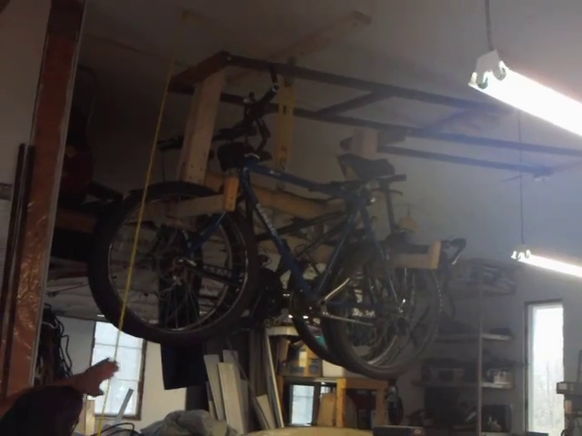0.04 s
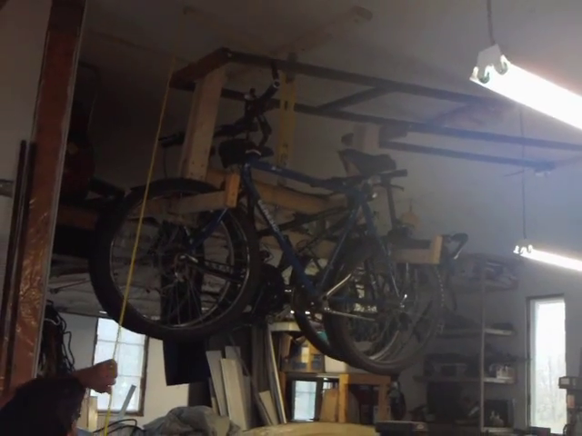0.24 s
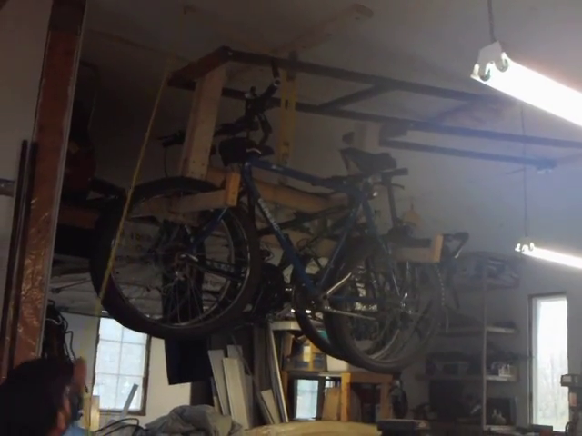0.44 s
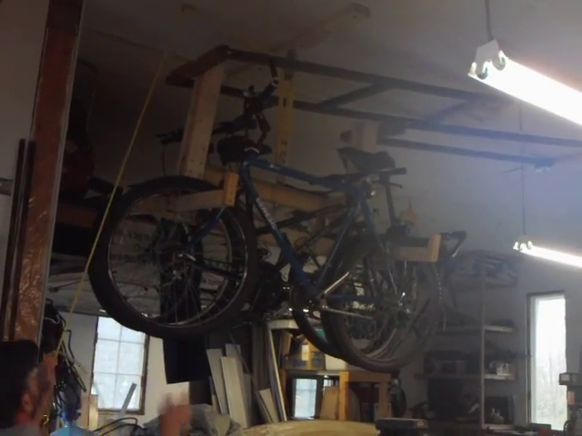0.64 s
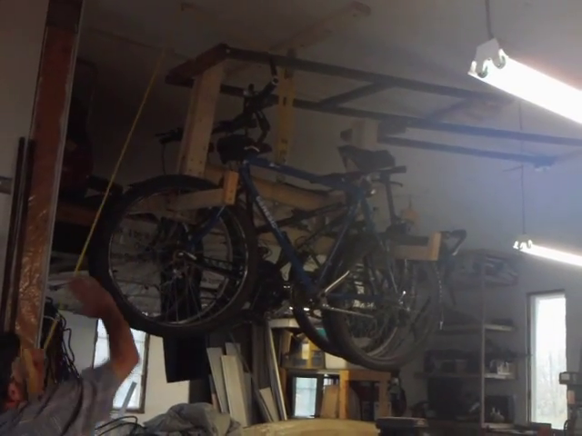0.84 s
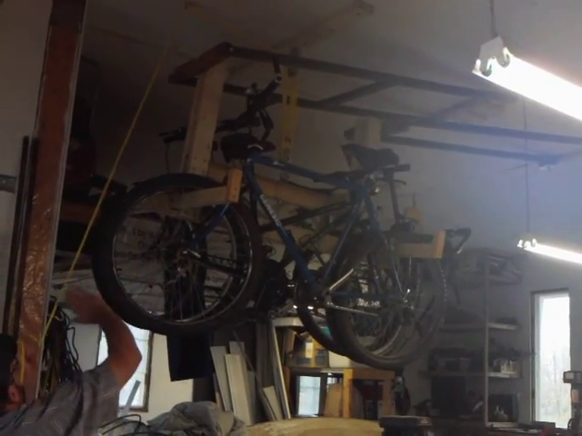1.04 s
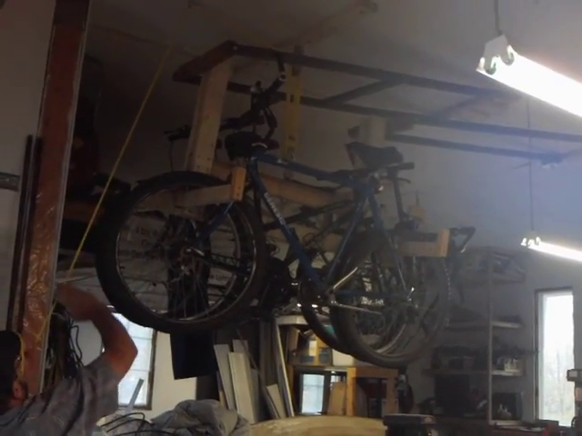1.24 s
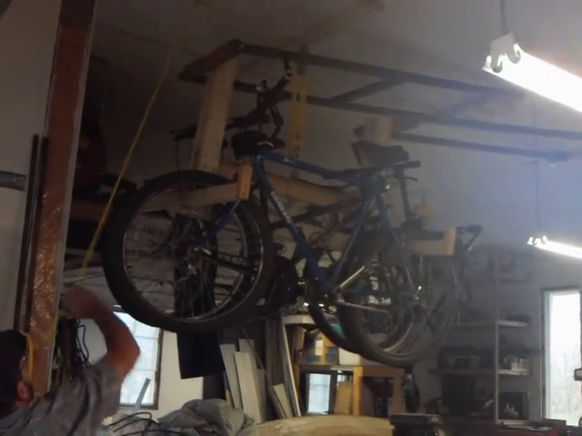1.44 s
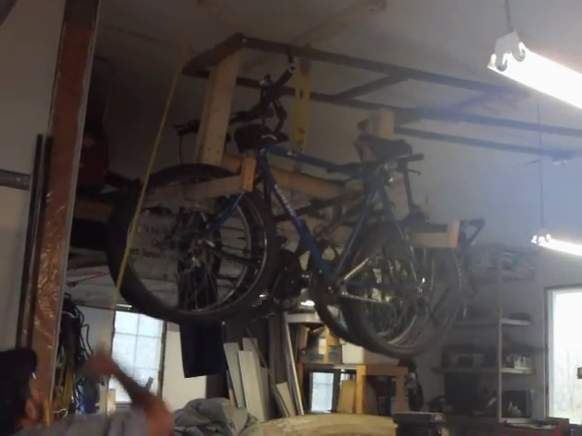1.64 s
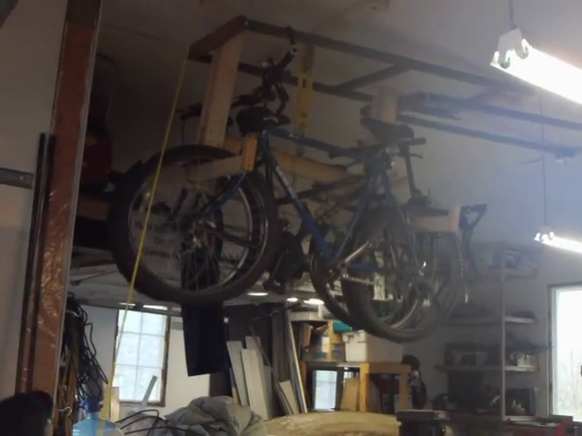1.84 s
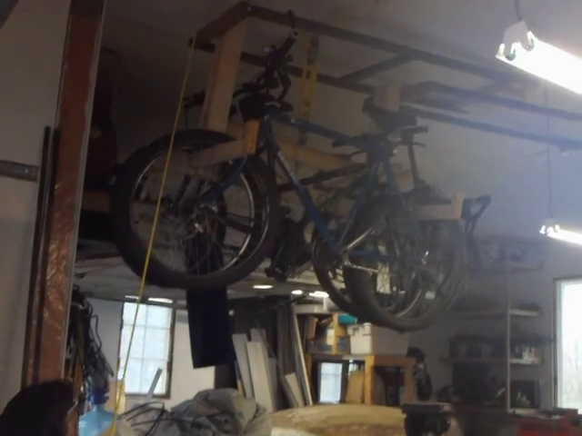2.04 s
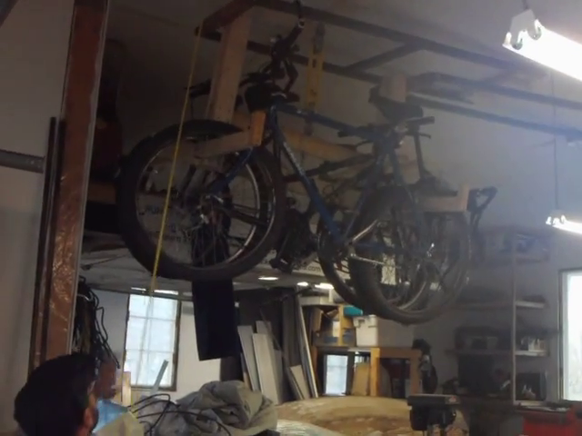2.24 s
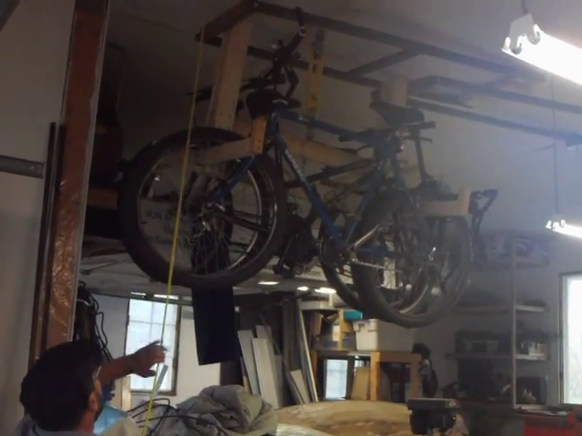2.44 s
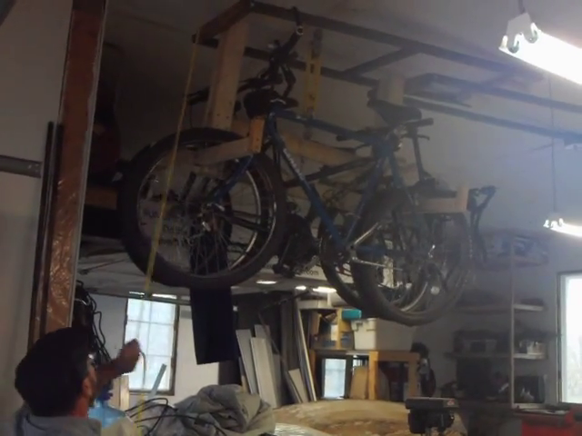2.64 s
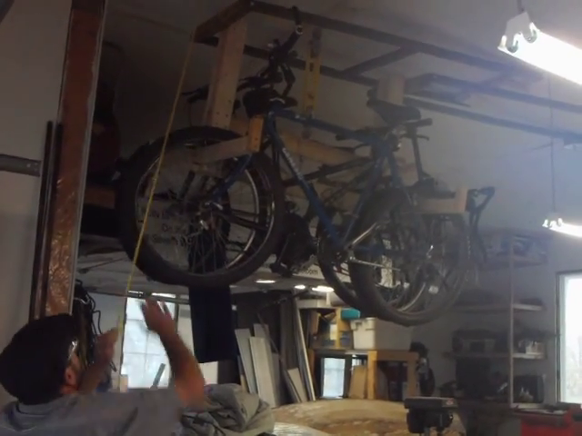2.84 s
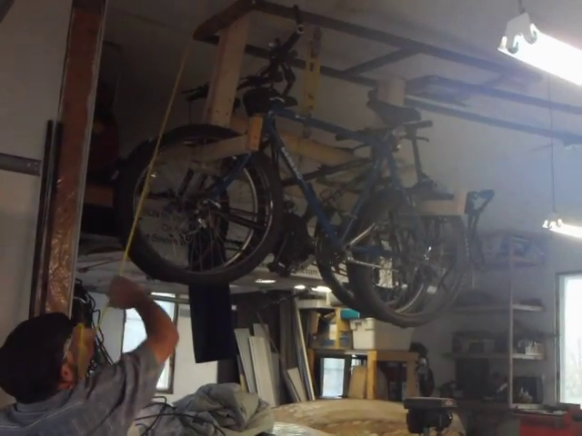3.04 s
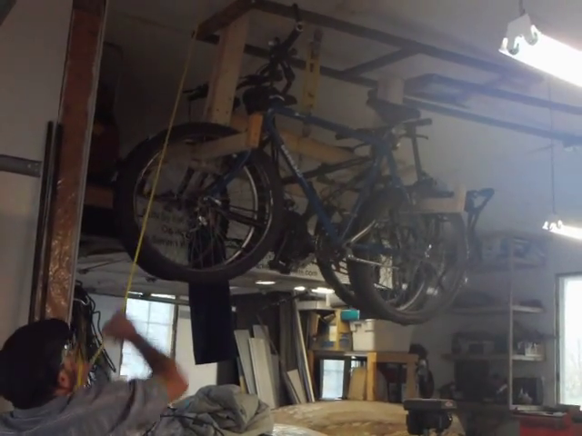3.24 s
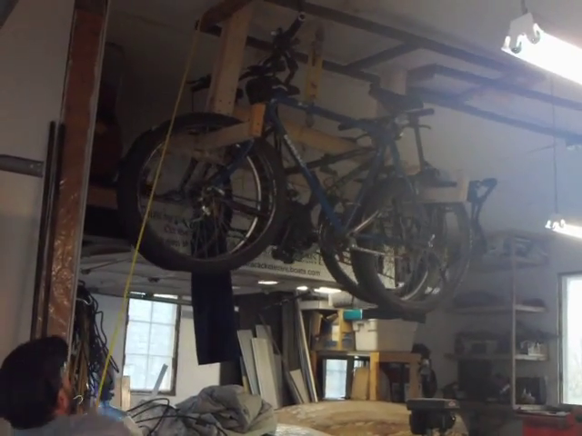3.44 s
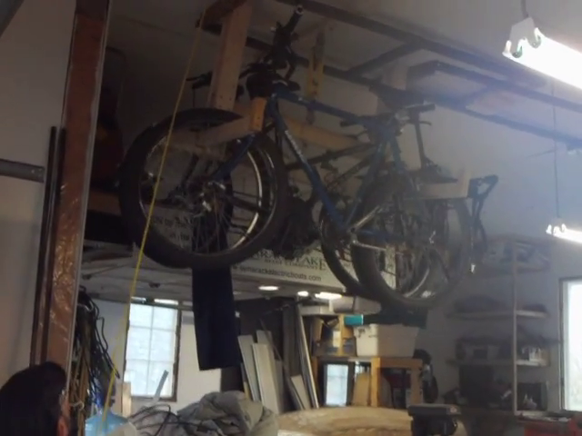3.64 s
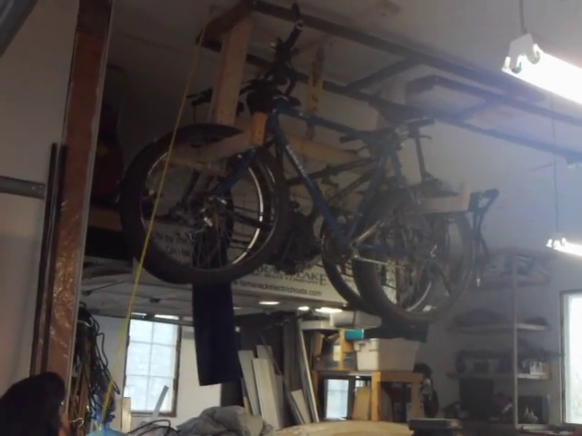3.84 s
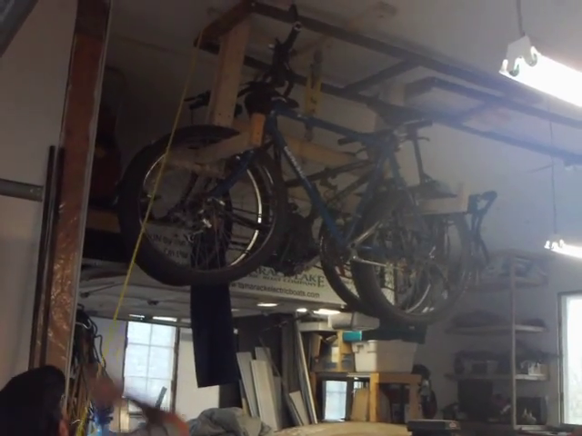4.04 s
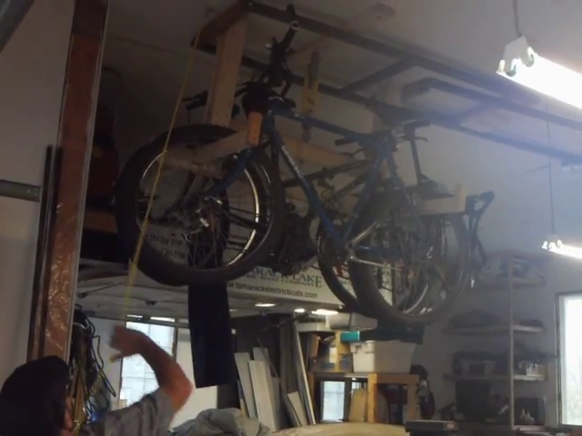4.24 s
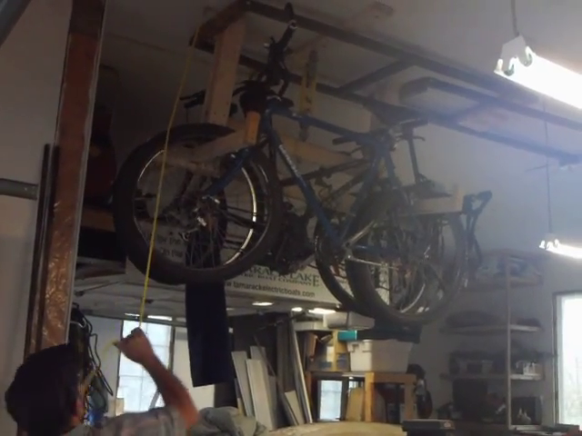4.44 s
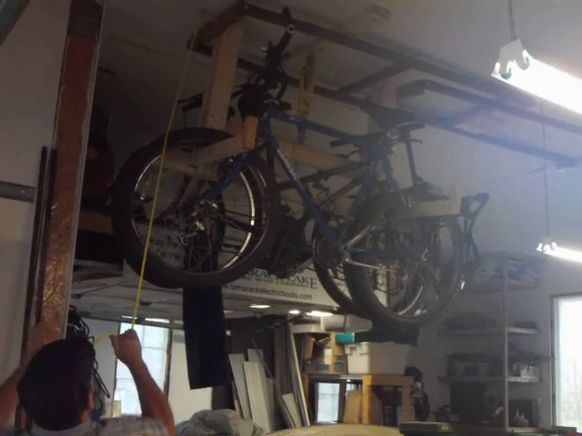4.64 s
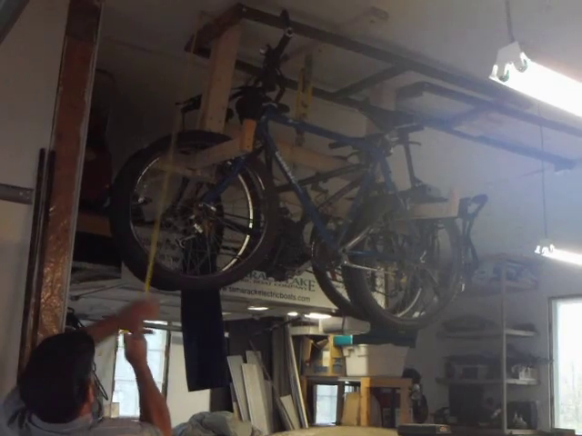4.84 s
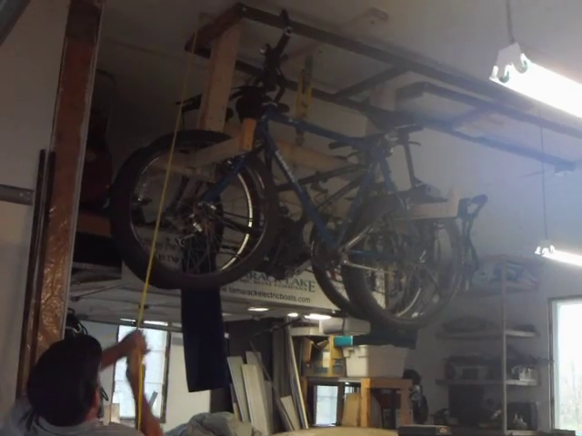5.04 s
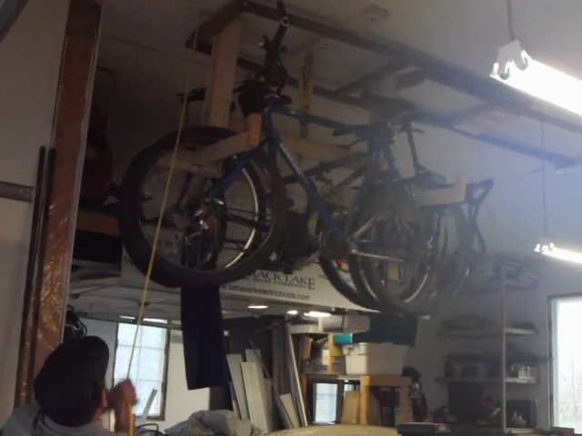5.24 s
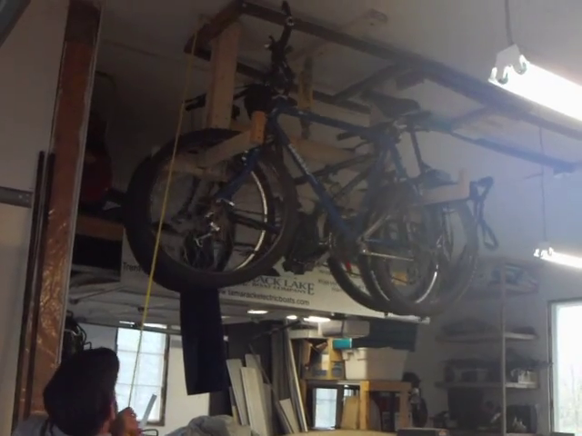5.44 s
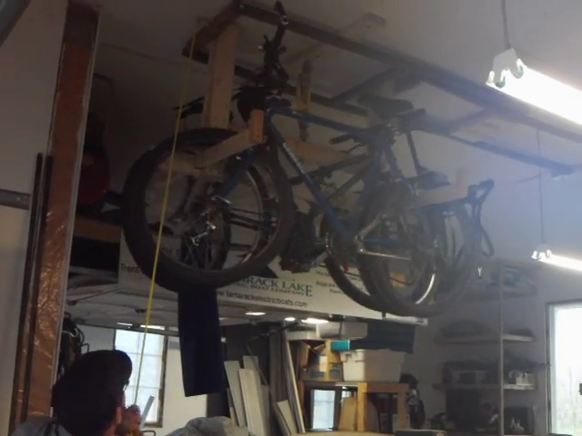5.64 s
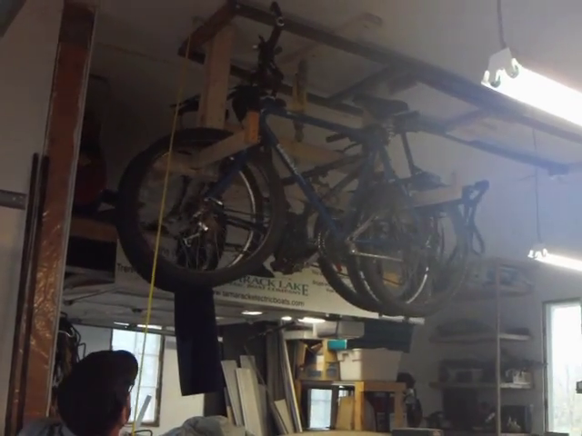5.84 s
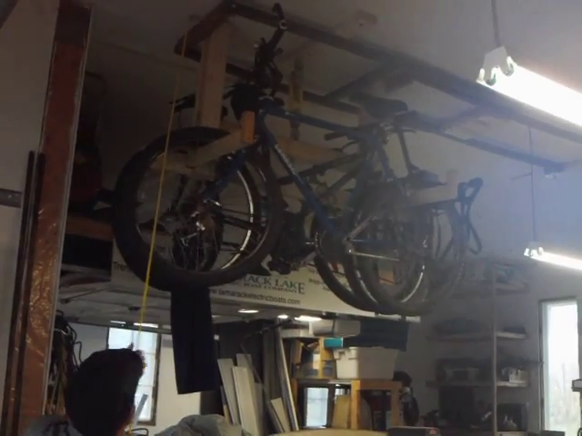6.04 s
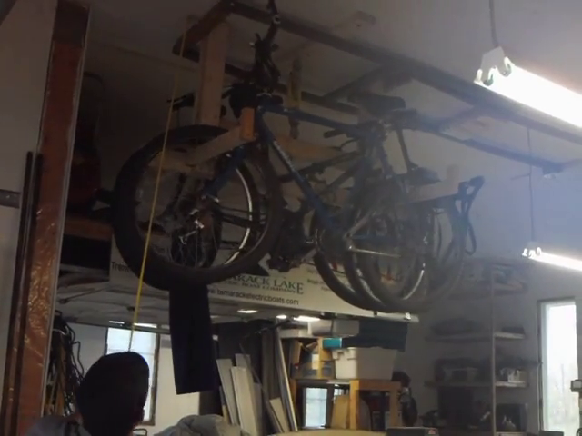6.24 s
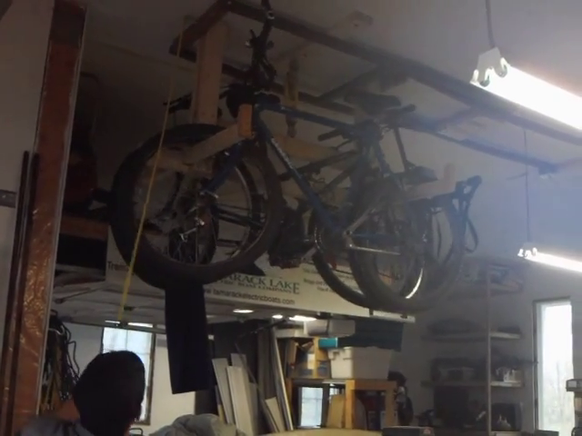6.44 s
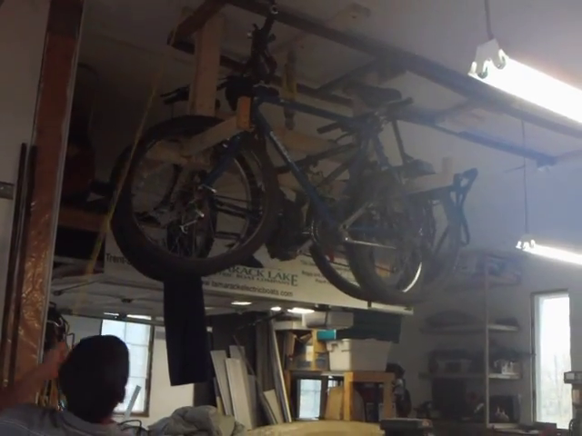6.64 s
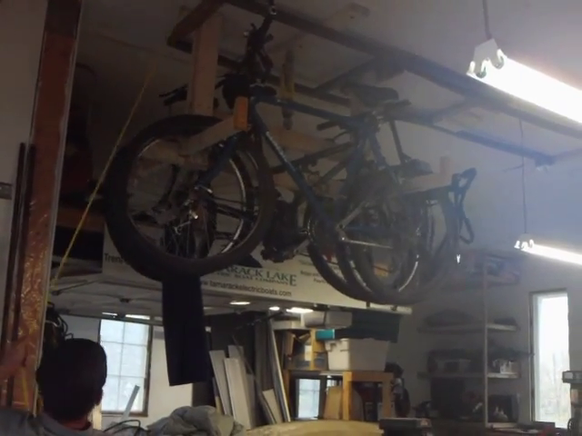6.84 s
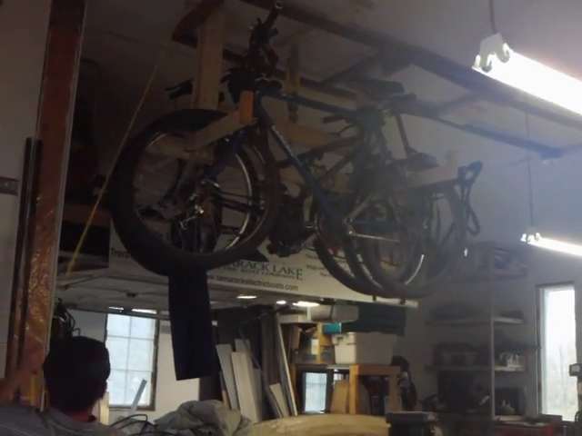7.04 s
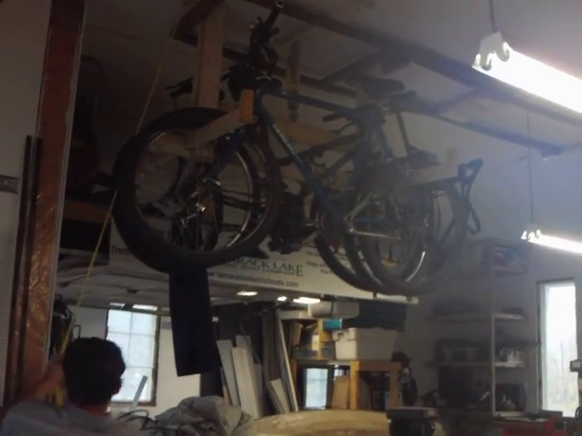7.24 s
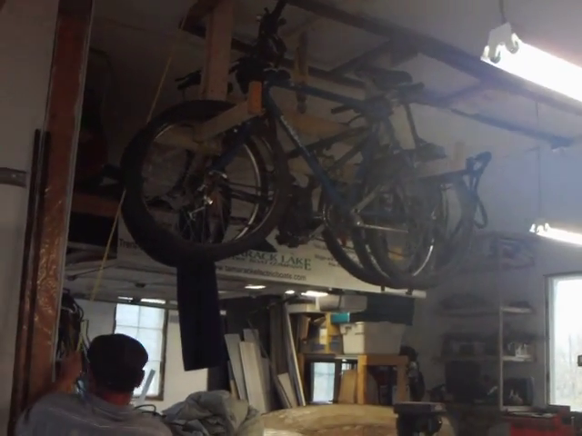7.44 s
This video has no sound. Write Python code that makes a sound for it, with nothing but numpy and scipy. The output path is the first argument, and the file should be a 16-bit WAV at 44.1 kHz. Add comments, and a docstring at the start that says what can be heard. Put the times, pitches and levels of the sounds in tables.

```python
"""A bare garage rumbles under recorder hiss and a thin whine; shaped noise and a sine make the bed.
Two slaps of hands on a rope (noise bursts) precede three pulls that hoist a loaded rack toward the ceiling.
In each pull fibre slips grind over the sheaves, shake and ring the rack; damped block modes tick rapidly.
A slap falls between the first two pulls; at the end filtered fibre noise knocks and rubs as the rope is made fast.
Decaying noise echoes from the room throughout."""
import sys
import numpy as np
from scipy import signal
from scipy.fft import rfft, irfft
from scipy.io import wavfile

SR = 44100
rng = np.random.default_rng(int(sys.argv[2]) if len(sys.argv) > 2 else 0)


def log_audio(samples):
    """Write samples as a 16-bit WAV file to the path given in sys.argv[1]."""
    # one column per channel
    frames = np.atleast_2d(samples).T
    # limit to full scale, then quantise
    limited = np.clip(frames, -1, 1)
    pcm = np.round(limited * 32767).astype(np.int16)
    wavfile.write(sys.argv[1], SR, pcm)


N = 330730
TIME = np.arange(N) / SR
FREQ = np.maximum(np.fft.rfftfreq(N, 1 / SR), 1)


def undb(db):
    """Decibels to gain."""
    return 10 ** (np.asarray(db) / 20)


def unit(x):
    """Scale to rms 1."""
    return x / np.sqrt(np.mean(x ** 2))


def lookup(hz, points):
    """Read (Hz, value) points on a log-frequency axis."""
    f, value = np.transpose(points)
    return np.interp(np.log(hz), np.log(f), value)


def colour(x, db):
    """Filter x by the gain curve db, at rms 1."""
    return unit(irfft(rfft(x) * undb(db), N))


def hump(hz, octaves):
    """A broad resonance in dB, 3 dB down at the given distance from its centre."""
    return -10 * np.log10(1 + (np.log2(FREQ / hz) / octaves) ** 4)


def convolve(x, response):
    """Pass x through an impulse response."""
    return signal.fftconvolve(x, response)[:N]


def add(out, s, sound):
    """Mix a sound in at time s."""
    i = max(int(s * SR), 0)
    out[i:i + len(sound)] += sound[:N - i]


def swell(s, length_s):
    """A smooth rise and fall around time s, down to 1/e^2 at length_s on either side."""
    return np.exp(-2 * ((TIME - s) / length_s) ** 2)


def ramp(s, length_s):
    """A linear rise from 0 to 1 centred on time s."""
    return np.clip((TIME - s) / length_s + .5, 0, 1)


def arch(stroke, peak, start_db, end_db):
    """Gain over a stroke (0 to 1): it rises from start_db to full at the peak, then sinks to end_db."""
    peak = np.clip(peak, .1, .9)
    rise_db = start_db * (1 - stroke / peak) ** 2
    fall_db = end_db * ((stroke - peak) / (1 - peak)) ** 2
    return undb(np.where(stroke < peak, rise_db, fall_db))


def fibres(rate_hz, spread_db):
    """Rope fibres catching and letting go: dense tiny slips of uneven size."""
    slips = rng.random(N) < rate_hz / SR
    return slips * rng.standard_normal(N) * undb(spread_db * rng.standard_normal(N))


def background(floor_db, waft_hz, whine_db, whine_hz):
    """Room rumble with slow, deep swells, and the hiss and thin whine of the electronics."""
    # garage and recorder floor, relative spectrum: f/Hz, level/dB
    floor_points = [(12, -19), (20, -8), (32, 2.5), (58, 1), (82, -4.5), (144, -6), (233, -11.5),
                    (254, -13), (721, -19), (903, -19.5), (1070, -20), (1540, -23.5), (13600, -32.5),
                    (15600, -31), (17000, -34)]
    # swells of deep rumble on the microphone: middle t/s, 1/e^2 half-length/s, level/dB
    waft_rows = [(2.27, 0.25, -36.5), (3.65, 0.2, -33), (5.51, .36, -33.5), (6.206, 0.81, -39)]
    floor = undb(floor_db) * colour(rng.standard_normal(N), lookup(FREQ, floor_points))
    air = colour(rng.standard_normal(N), -20 * np.log10(1 + (FREQ / waft_hz) ** 2))
    wafts = sum(undb(db) * swell(s, length_s) for s, length_s, db in waft_rows)
    whine = undb(whine_db) * np.sin(2 * np.pi * whine_hz * TIME)
    return floor + air * wafts + whine


def hands(rise_s):
    """Hands and rope slap together: coloured noise with a fast rise and exponential decay."""
    # slaps: t/s, relative level/dB, decay/s, treble tilt/(dB/octave)
    slap_rows = [(0.0, -36.5, 0.013, -1), (0.557, -30, 0.012, -1), (2.807, -34, 0.014, -1)]
    # slap colour before the tilt: f/Hz, relative level/dB
    slap_points = [(200, -35), (650, -16), (950, 0.5), (1300, -1), (2000, -7), (3000, -4), (4500, -13),
                   (6200, -10.5), (8000, -19), (12000, -14), (16000, -32)]
    out = np.zeros(N)
    for s, db, decay_s, tilt_db in slap_rows:
        age = np.maximum(TIME - s, 0)
        skin = colour(rng.standard_normal(N), lookup(FREQ, slap_points) + tilt_db * np.log2(FREQ))
        out += undb(db) * skin * (1 - np.exp(-age / rise_s)) * np.exp(-age / decay_s)
    return out


def garage(build_s):
    """Diffuse echo: noise that builds up quickly and decays at a rate set by frequency, fastest at the top."""
    # reverberation: f/Hz, t60/s
    t60_points = [(100, 0.68), (400, 0.42), (1200, 0.54), (3000, 0.46), (6000, 0.45), (9000, 0.31),
                  (15000, 0.23)]
    t = TIME[:SR]
    f, _, frames = signal.stft(rng.standard_normal(SR), SR, nperseg=256)
    age = np.linspace(0, 1, frames.shape[1])
    frames = frames * np.exp(-np.log(1000) * age / lookup(f + 1, t60_points)[:, None])
    tail = signal.istft(frames, SR)[1][:SR] * (1 - np.exp(-t / build_s))
    return tail / np.sqrt(np.mean(abs(rfft(tail)[500:6000]) ** 2))  # unit mean power gain, 500-6000 Hz


def room(x, build_s, patterns_per_s, count):
    """The load swings and the hauler moves, so the sound fades from one echo pattern to the next in a cycle."""
    out = 0
    for k in range(count):
        place = (TIME * patterns_per_s - k) % count
        share = np.sqrt(np.maximum(1 - abs(place - 1), 0))  # equal-power crossfade
        out = out + convolve(x * share, garage(build_s))
    return out


def rope(grind_db, shudder_db, take_up_s, attack_s, release_s):
    """The loaded rope grinds over the sheaves, shakes the rack and hisses through the hands while pulled."""
    # pulls: slack taken up t/s, load moves t/s, end t/s, then relative grind, shudder, hiss level/dB
    pulls = [(1.706, 1.711, 2.215, -31.1, -34.3, -60), (3.397, 3.48, 3.828, -30.1, -35, -47.5),
             (5.152, 5.19, 5.51, -31.3, -35, -42.3)]
    # rope grinding on the sheaves: f/Hz, relative level/dB
    grind_points = [(150, -26), (290, -1.5), (440, -8), (620, -1), (1050, 0.5), (1550, -1.2), (2100, -4),
                    (3100, -2), (3700, -7.5), (4500, -10), (5050, -10.5), (6000, -7), (6800, -17),
                    (10000, -19.3), (16000, -33)]
    # shuddering rack: f/Hz, relative level/dB
    shudder_points = [(40, -11), (80, -3), (120, 0), (190, -1), (260, -6.5), (450, -13), (1500, -30)]
    grind = colour(fibres(rate_hz=9000, spread_db=0.5), lookup(FREQ, grind_points))
    shudder = colour(fibres(rate_hz=600, spread_db=3.0), lookup(FREQ, shudder_points))
    hiss = colour(fibres(rate_hz=7000, spread_db=4.5), hump(hz=10100, octaves=.13))
    out = np.zeros(N)
    slack = undb(-6)  # softer until the load moves
    for taut, start, end, db, shake_db, hiss_db in pulls:
        stroke = np.clip((TIME - start) / (end - start), 0, 1)
        onset = slack * ramp(taut, take_up_s) + (1 - slack) * ramp(start, attack_s)
        moving = onset * (1 - ramp(end, release_s))
        effort = arch(stroke, peak=.57, start_db=-3, end_db=-4.2)
        shake = arch(stroke, peak=.45, start_db=-1, end_db=-20)  # settles early
        speed = moving * effort
        out += speed * undb(grind_db + db) * grind
        out += speed ** 2 * undb(hiss_db) * hiss  # hiss grows with speed squared
        out += moving * shake * undb(shudder_db + shake_db) * shudder
    return out


def rack(drive, ring_db):
    """Frames and spokes on the rack ring along with the rope: damped sines driven by its sound."""
    # rack and load modes: f/Hz, relative level/dB, t60/s
    rack_modes = [(665, 6.5, 0.19), (934, -5, 0.25), (1036, 3, 0.15), (1363, -14, .2), (1556, 7, 0.22),
                  (1850, -16, 0.22), (2715, -2, 0.22), (3213, 6, 0.52), (4294, -18, .2), (5566, -7, .2),
                  (5944, -14, .2)]
    t = TIME[:SR // 2]
    response = np.zeros(len(t))
    for hz, db, t60_s in rack_modes:
        decay = np.exp(-np.log(1000) * t / t60_s)
        response += undb(db) / np.sqrt(t60_s) * decay * np.sin(2 * np.pi * hz * t)
    return unit(convolve(drive, response)) * np.std(drive) * undb(ring_db)


def tick_train(gap_s, uneven_db):
    """The pulley ticks evenly through each run, every tick a little different in strength: (s, dB, tilt)."""
    # tick runs (equal ends: one tick): first t/s, last t/s, relative peak level/dB, treble tilt/(dB/octave)
    runs = [(1.7215, 1.8021, -14.5, .5), (1.8351, 1.9498, -12.7, 0.0), (1.9734, 2.1425, -11.8, -3),
            (1.9924, 2.0353, -16.5, -1.5), (3.4772, 3.5972, -11.5, -2.5), (3.6287, 3.6724, -11.3, -.8),
            (3.7464, 3.7857, -14.2, 2.3), (5.2022, 5.2351, -13, -3), (5.224, 5.224, -16, 4),
            (5.3392, 5.3392, -15, 3.5), (5.4513, 5.4513, -11.5, .5)]
    ticks = []
    for first, last, db, tilt_db in runs:
        for s in np.linspace(first, last, 1 + round(abs(last - first) / gap_s)):
            ticks.append((s, db + uneven_db * rng.standard_normal(), tilt_db))
    return ticks


def pulley(rise_s, ring_s, scatter_db, ceiling_s, ceiling_db, wall_s, wall_db):
    """Each tick rings the block for about 2 ms; the ceiling returns a brighter copy and a wall a late one."""
    # pulley block modes: f/Hz, relative level toward microphone/dB, toward ceiling/dB
    block_modes = [(1090, -17, -22), (2270, -14, -16), (3190, -4.5, -14), (4164, -1.5, -23),
                   (4605, 1.5, -15), (5560, -1, -12), (5996, -0.5, -10), (7140, -16, -16),
                   (7920, -19, -7.5), (8650, -26, -9.5), (9610, -15, -19), (11460, -19, -17),
                   (12700, -25, -20.5), (14300, -31, -24)]
    hz, ahead_db, up_db = np.transpose(block_modes)
    t = TIME[:SR // 50]
    shape = (1 - np.exp(-(t / rise_s) ** 2)) * np.exp(-(t / ring_s) ** 2)
    out = np.zeros(N)
    for s, db, tilt_db in tick_train(gap_s=.041, uneven_db=.4):
        detune, phase, scatter = rng.standard_normal((3, len(hz)))
        cycles = np.outer(hz * (1 + 0.027 * detune), t) + phase[:, None]
        rings = np.sin(2 * np.pi * cycles) * shape
        size = undb(scatter_db * scatter + tilt_db * np.log2(hz / hz[2]))
        ahead = (size * undb(ahead_db)) @ rings
        up = (size * undb(up_db)) @ rings
        gain = undb(db) / abs(ahead).max()
        add(out, s, gain * ahead)
        add(out, s + ceiling_s, gain * undb(ceiling_db) * up)
        add(out, s + wall_s, gain * undb(wall_db) * ahead)
    return out


def joists(x, build_s, scatter_s, scatter_db):
    """Beams and frames close to the pulley scatter each tick into a short, dense rattle."""
    t = TIME[:SR // 10]
    response = rng.standard_normal(len(t)) * np.exp(-t / scatter_s) * (1 - np.exp(-t / build_s))
    return x + undb(scatter_db) * convolve(x, response / np.linalg.norm(response))


def handling(knock_octaves):
    """Dull knocks and soft rubs, band-filtered fibre slips, as the rope is gathered and made fast."""
    # knocks of feet and frame: t/s, relative level/dB, decay/s, f/Hz
    knocks = [(5.703, -27, 0.0072, 305), (5.707, -38.5, .014, 616), (6.65, -37, 0.027, 226),
              (6.70, -40, .03, 300), (6.84, -42, 0.051, 235), (6.93, -45, .04, 237)]
    # rubs of rope, sleeves and feet: middle t/s, 1/e^2 half-length/s, relative level/dB,
    # hump centre f/Hz, hump half-width/octaves
    rubs = [(2.186, 0.039, -38, 1170, .35), (5.713, 0.083, -40, 640, 1.6), (6.062, 0.045, -45, 1050, 0.47),
            (6.07, 0.1, -50.5, 3180, .6), (6.3, .25, -52, 550, 1.1), (6.366, 0.059, -52, 8360, .15),
            (6.42, 0.042, -42.5, 3360, 0.62), (6.58, 0.017, -44.5, 3200, 0.68),
            (6.731, 0.04, -35.7, 3020, 0.62), (6.722, 0.07, -39, 800, 0.42), (6.98, 0.24, -47, 640, 0.45),
            (7.13, .14, -52, 8000, 1.7), (7.422, 0.27, -44.5, 134, .2)]
    out = np.zeros(N)
    grain = fibres(rate_hz=7000, spread_db=4.5)
    for s, db, decay_s, hz in knocks:
        envelope = (TIME > s) * np.exp(-abs(TIME - s) / decay_s)
        out += undb(db) * colour(grain, hump(hz, knock_octaves)) * envelope
    for s, length_s, db, hz, octaves in rubs:
        dulled = hump(hz, octaves) - 3 * np.log2(1 + FREQ / hz)
        out += undb(db) * colour(grain, dulled) * swell(s, length_s)
    return out


def scene():
    """Mix each source's direct sound with its echoes in the room, over the background."""
    bed = background(floor_db=-42.7, waft_hz=17.5, whine_db=-60.5, whine_hz=15734.4)
    small = hands(rise_s=0.0017) * undb(5) + handling(knock_octaves=0.22)
    run = rope(grind_db=1.5, shudder_db=-0.5, take_up_s=.022, attack_s=.012, release_s=.03)
    run = run + rack(run, ring_db=-17.5)
    ticks = pulley(rise_s=0.0012, ring_s=0.0017, scatter_db=1.2,
                   ceiling_s=0.0058, ceiling_db=-0.3, wall_s=.023, wall_db=-21.5)
    rattle = joists(ticks, build_s=0.0011, scatter_s=0.0038, scatter_db=-5.5)
    direct = undb(1.26) * rattle + undb(-3.0) * run + undb(-4.0) * small
    send = undb(-1) * ticks + undb(-1.0) * run + undb(-2.5) * small
    echo = room(send, build_s=0.0015, patterns_per_s=14, count=5)
    return (direct + echo + bed)[None]


def record(dry):
    """The recorder cuts the top of the band: a steep elliptic low-pass."""
    top_hz = 17300
    return signal.sosfilt(signal.ellip(10, .2, 70, top_hz, fs=SR, output="sos"), dry)


dry = scene()
out = record(dry)
log_audio(out)
```